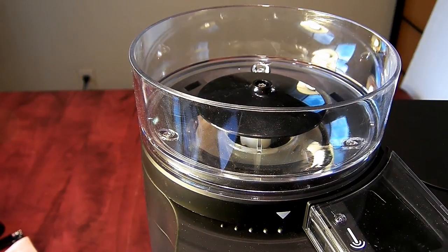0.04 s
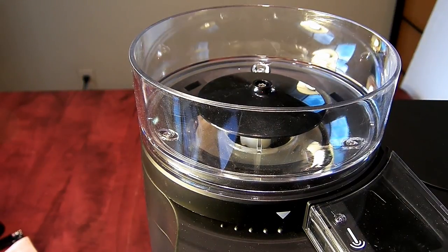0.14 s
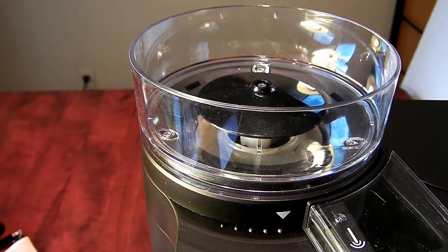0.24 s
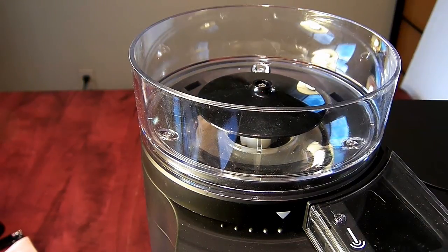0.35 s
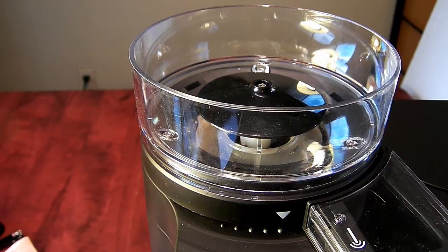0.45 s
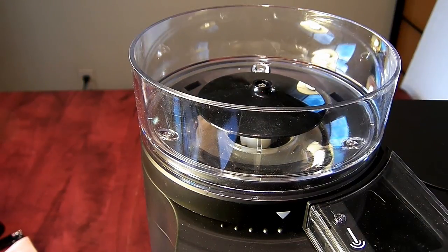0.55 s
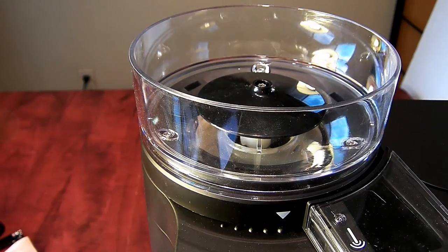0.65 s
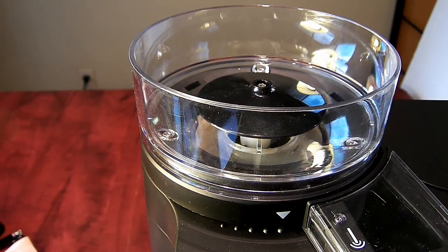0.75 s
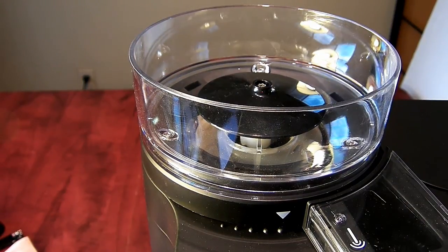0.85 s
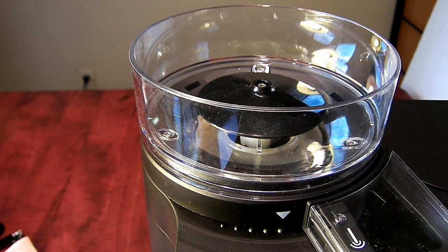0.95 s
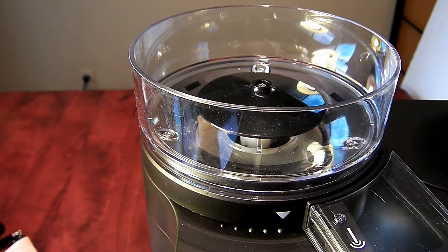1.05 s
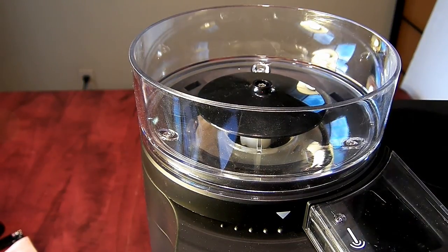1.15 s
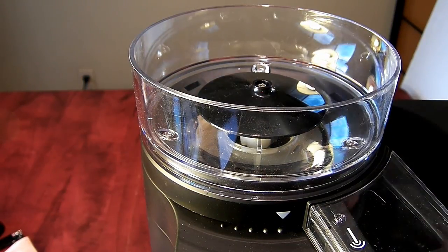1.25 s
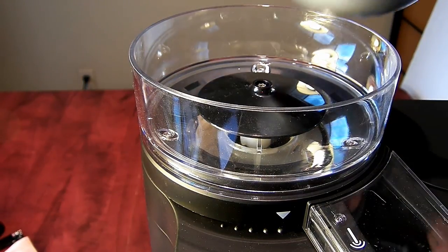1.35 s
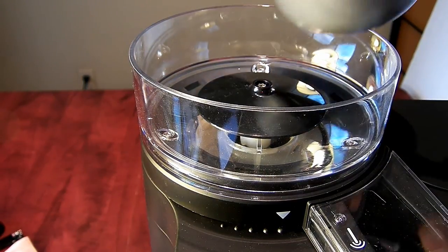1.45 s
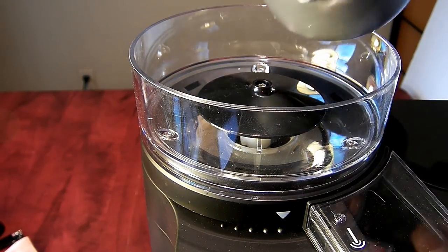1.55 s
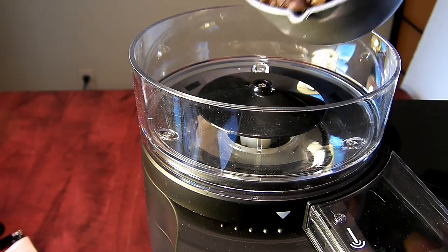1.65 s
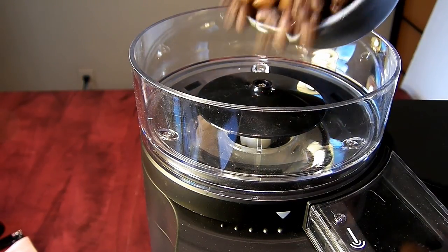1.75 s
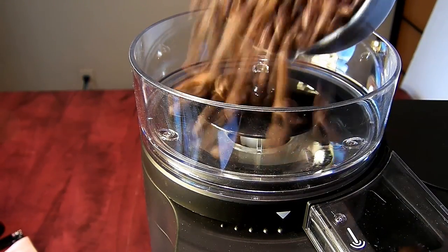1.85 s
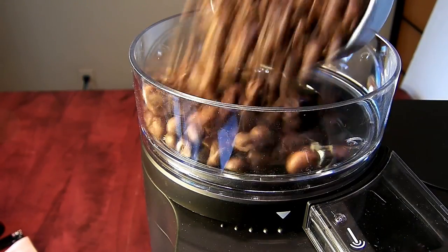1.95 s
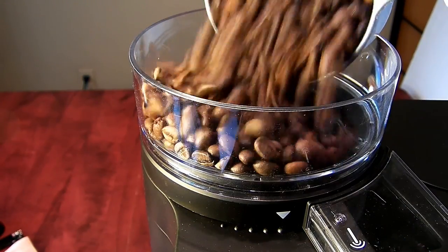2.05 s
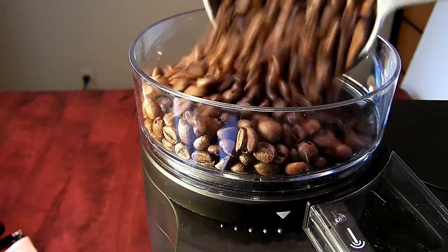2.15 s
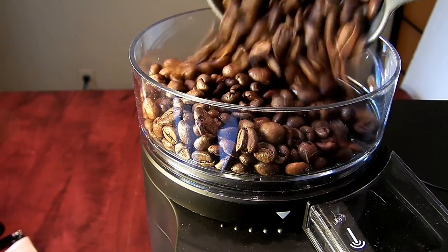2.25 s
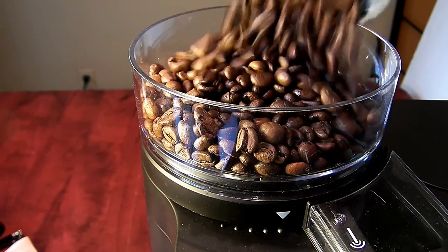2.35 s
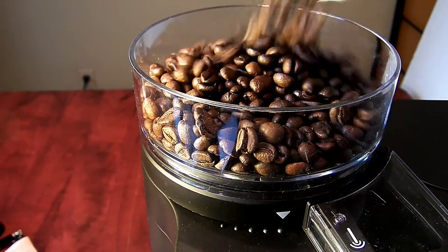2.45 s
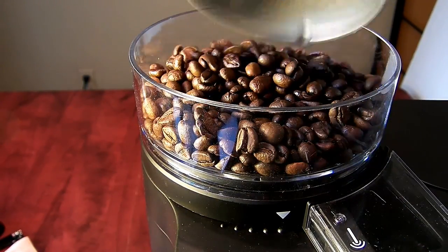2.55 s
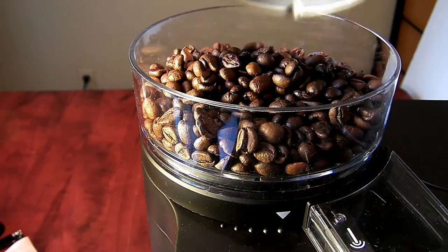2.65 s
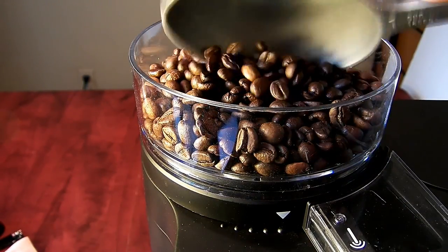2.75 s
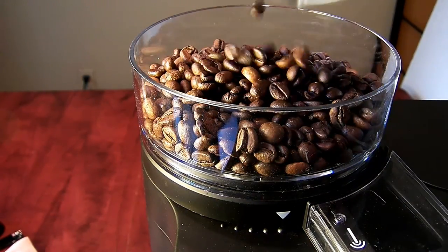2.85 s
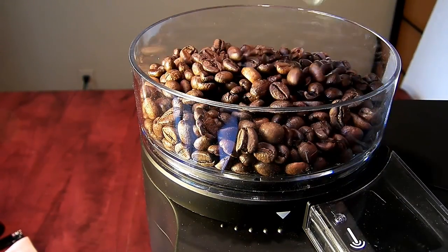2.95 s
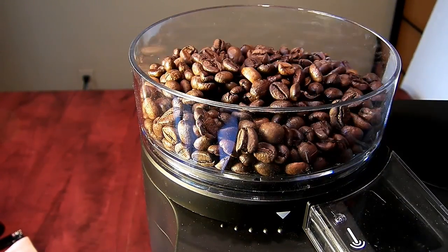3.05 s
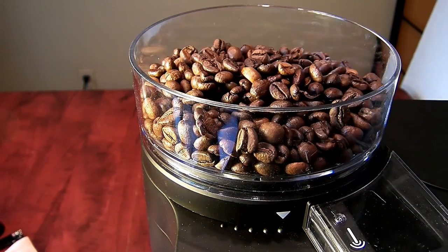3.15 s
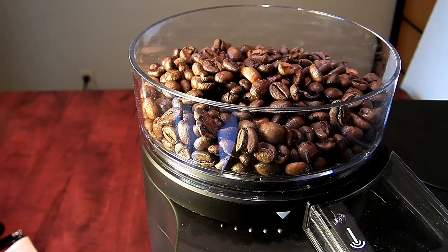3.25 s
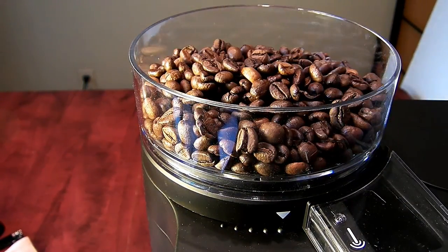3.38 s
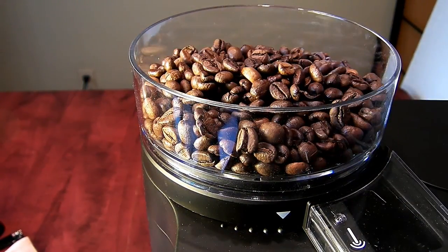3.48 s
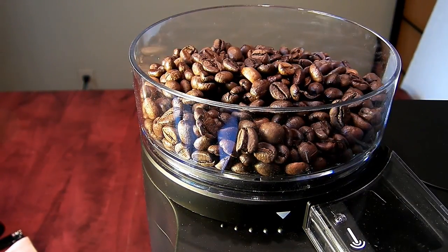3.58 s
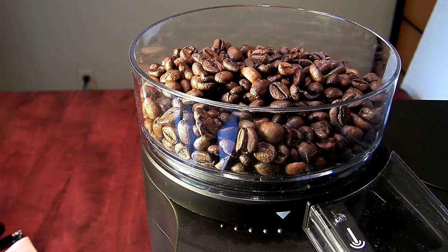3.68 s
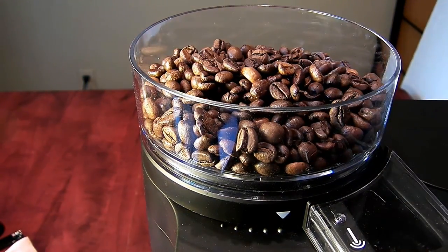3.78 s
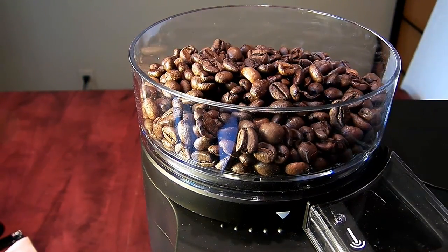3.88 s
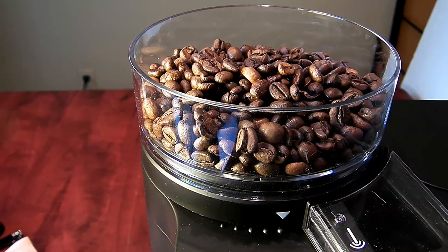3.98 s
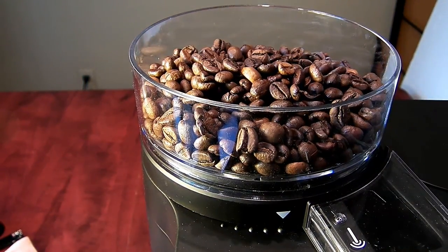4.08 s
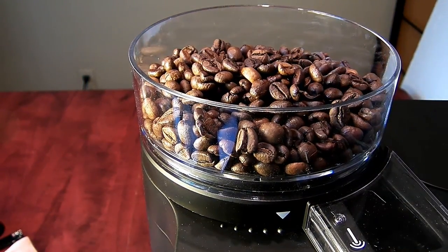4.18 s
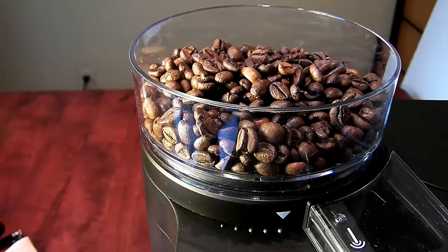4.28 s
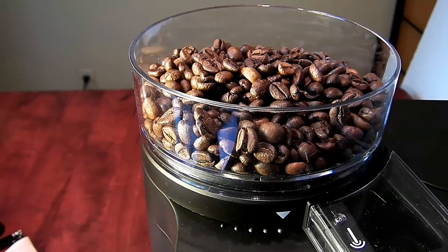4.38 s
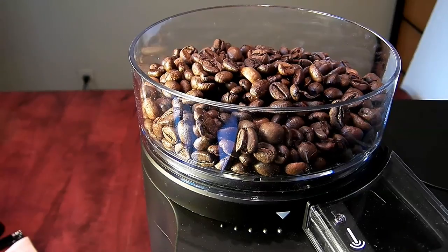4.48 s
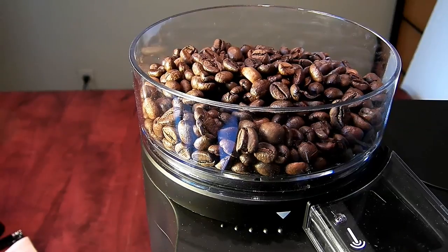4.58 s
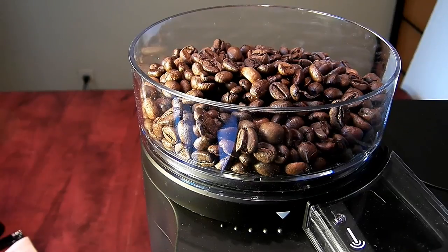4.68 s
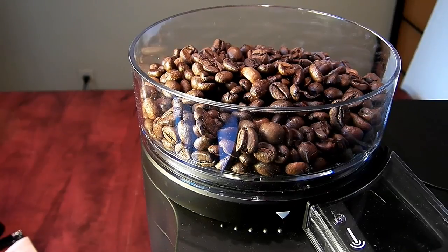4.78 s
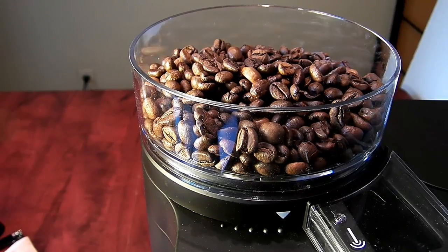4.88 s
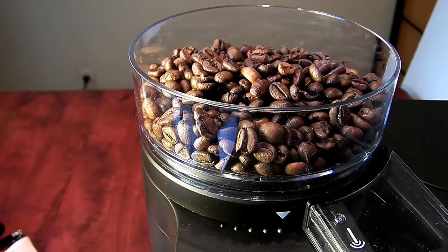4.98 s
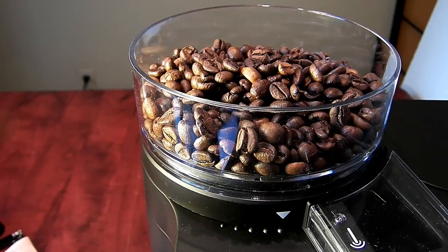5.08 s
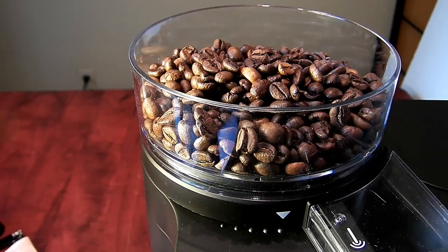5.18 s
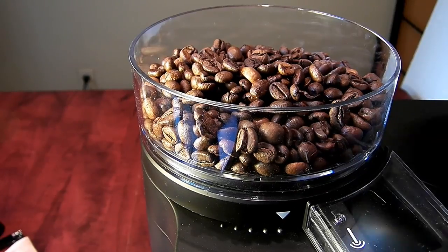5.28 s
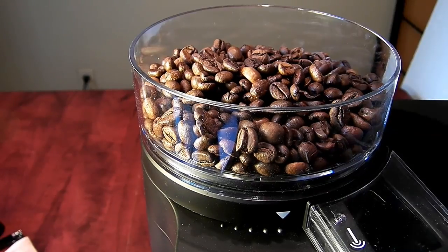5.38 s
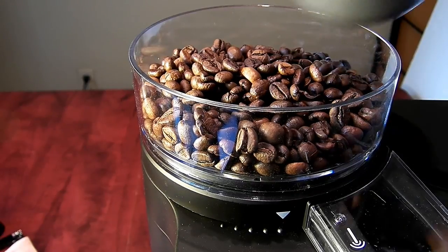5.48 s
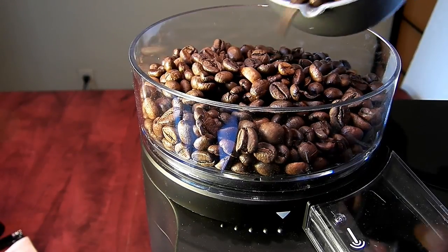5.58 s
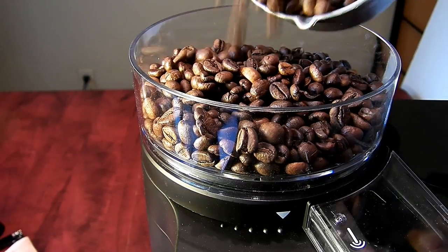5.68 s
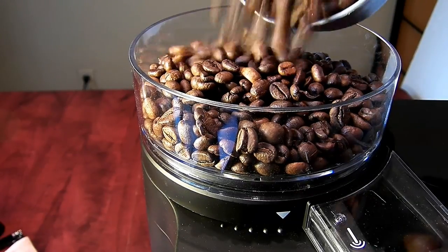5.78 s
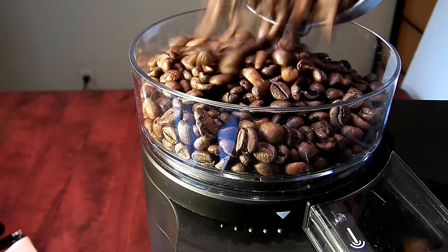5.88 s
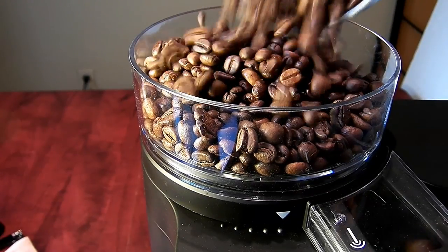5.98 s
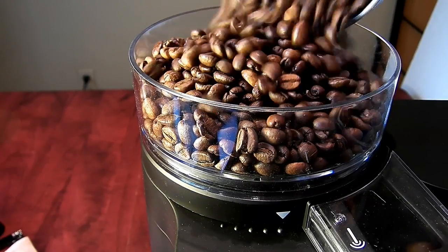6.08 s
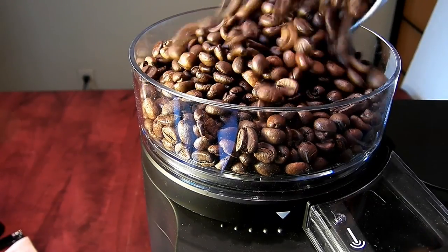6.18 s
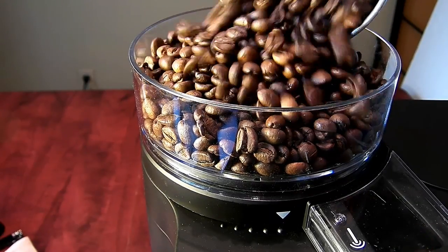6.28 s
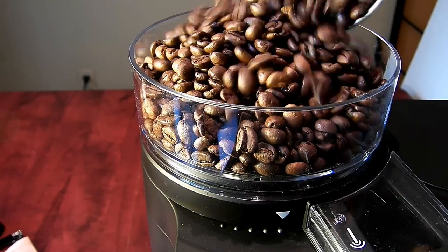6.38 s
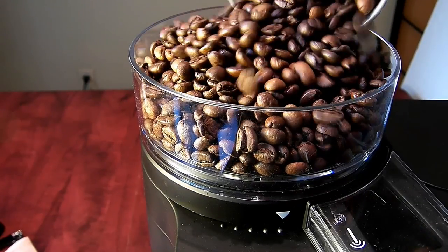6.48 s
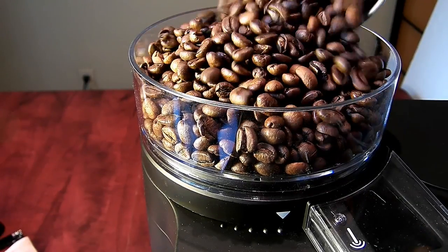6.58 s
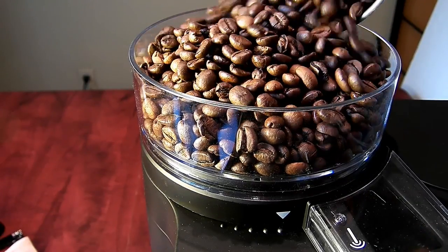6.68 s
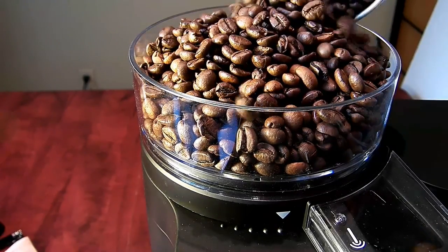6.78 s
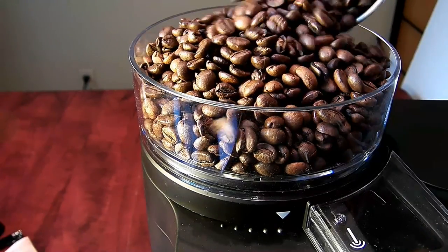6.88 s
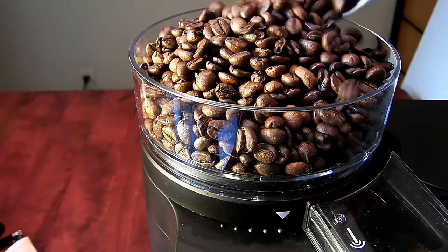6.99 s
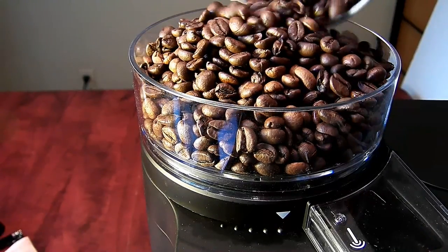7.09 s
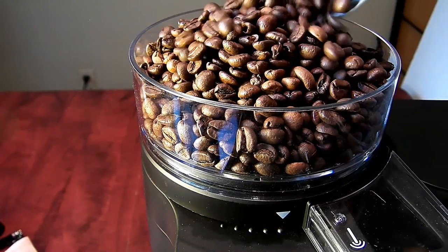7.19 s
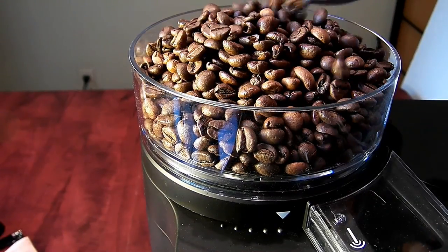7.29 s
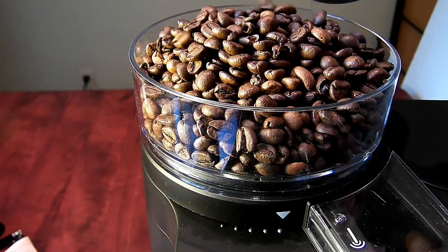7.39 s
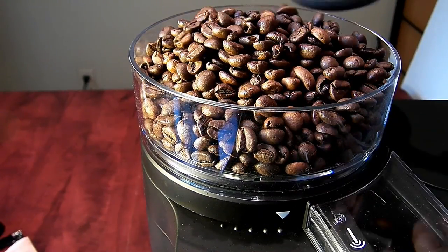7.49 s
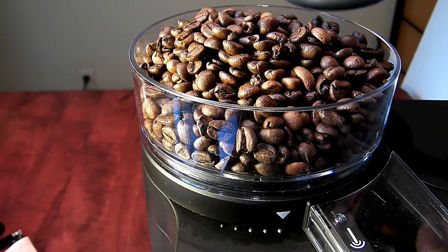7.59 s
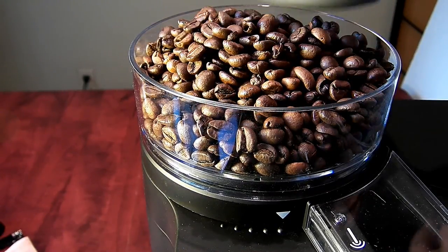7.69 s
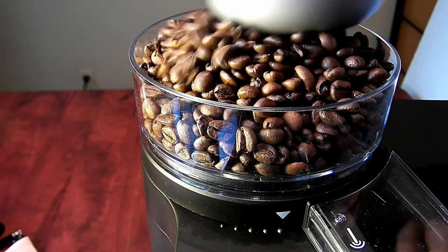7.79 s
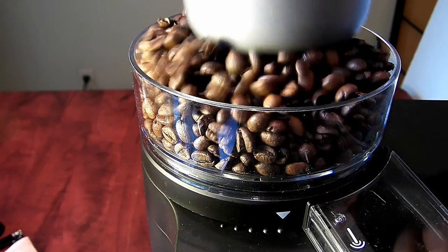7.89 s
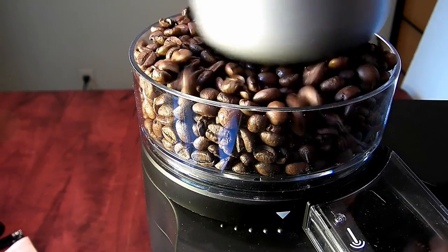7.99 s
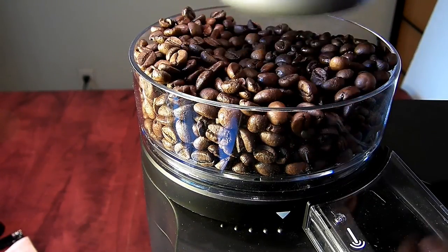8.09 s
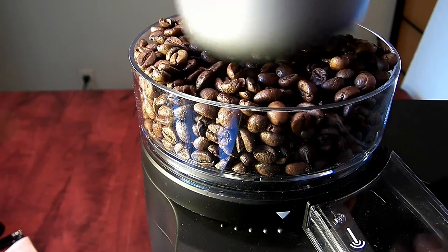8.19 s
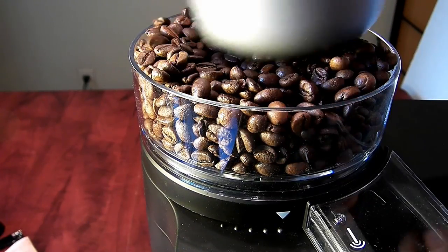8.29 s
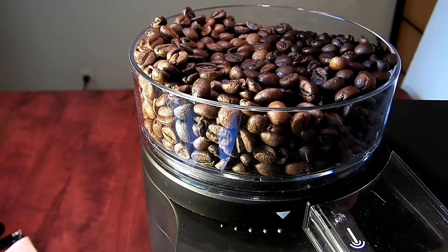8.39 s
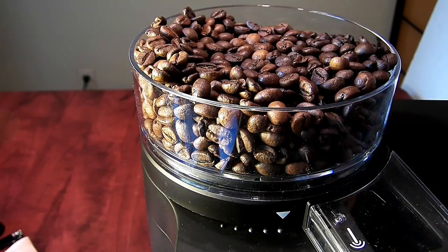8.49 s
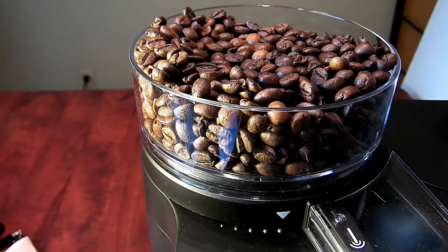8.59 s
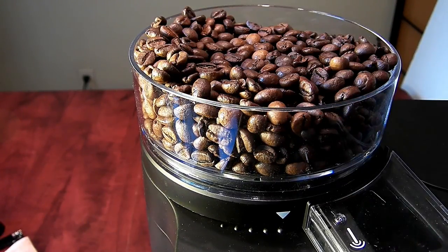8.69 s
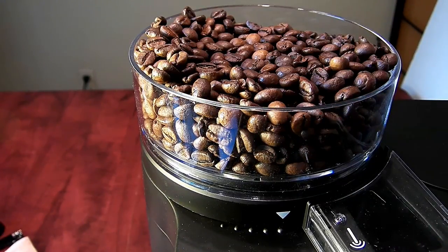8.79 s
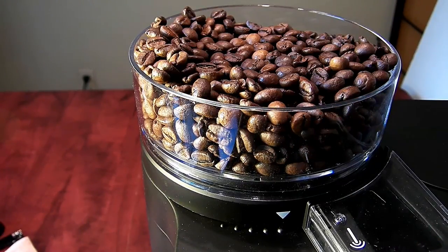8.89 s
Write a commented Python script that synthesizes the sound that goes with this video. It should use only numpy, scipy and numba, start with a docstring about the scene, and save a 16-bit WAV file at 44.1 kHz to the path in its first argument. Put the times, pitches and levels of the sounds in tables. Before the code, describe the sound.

Close stereo pickup in a small quiet kitchen with low hum and hiss. Faint bag rustle and scoop knocks on the left, then beans burst brightly into an empty plastic hopper and trickle out. The scoop digs dully in the crinkling bag, then a longer, softer pour clatters onto the heap. The scoop pushes the beans level, pats once, and quiet returns.

```python
"""A scoop digs in a bag of coffee beans to the right, over a low room tone and microphone hiss.
Twice beans are poured into a clear plastic hopper, first empty, then onto the heap, which is levelled and patted.
Moving beans are random bursts over noise; single beans are timed bursts; scoop knocks are dying sines.
Room tone and hiss are coloured noise whose levels a table lowers after the loud moments.
A short room answer and a rounding, band-limited input finish the sound."""
import sys
import numpy as np
from scipy import signal
from scipy.fft import rfft, irfft, next_fast_len
from scipy.io import wavfile
from scipy.ndimage import uniform_filter1d, map_coordinates
from numba import njit

SR = 44100
rng = np.random.default_rng(int(sys.argv[2]) if len(sys.argv) > 2 else 0)


def wav_record(signal):
    """Record a signal, one row per channel, as 16-bit PCM in the file named by sys.argv[1]."""
    frames = np.transpose(np.atleast_2d(signal))
    bounded = np.clip(frames, -1, 1)
    # unit amplitude maps onto the largest positive 16-bit level
    quanta = np.round(bounded * 32767).astype(np.int16)
    wavfile.write(sys.argv[1], SR, quanta)


N = 394254

# floor level: time_s, hum_db, hiss_db
FLOOR = [(0, -49, -55.5), (.6, -57.5, -58), (1.7, -53.5, -56), (1.97, -62.5, -70), (2.4, -76, -67),
         (2.75, -62, -62), (3.1, -61, -64.5), (3.35, -52.5, -56), (4.7, -49.5, -53), (5.2, -57.5, -59),
         (5.75, -49.5, -53), (6.5, -58, -61), (7.1, -51.5, -62), (7.89, -55.5, -63), (7.97, -65, -60),
         (8.4, -65, -72.5), (8.55, -58.5, -64.5), (8.7, -56, -57.5), (8.94, -56.5, -57.5)]
# faint whine that comes and goes: start_s, length_s, level_db
WHINES = [(0.886, 0.34, -66.5), (3.187, .3, -63), (8.612, 0.17, -68.5)]
WHINE_FADE_DB_PER_S = 150
# spectra of house hum, microphone hiss and whine: freq_hz, density_db
HUM_COLOUR = [(15, -48), (25, -26.5), (108, -8.5), (313, -18), (382, -5), (727, -14), (794, -16),
              (948, -16), (1180, -18.5), (1350, -17), (1540, -26), (1890, -21.5), (2350, -31),
              (3670, -31.5), (5000, -49), (6500, -75.5), (11000, -120)]
HISS_COLOUR = [(1470, -53), (2500, -30), (3200, -17), (3750, -4), (4500, -11), (6000, -9.5), (11100, -6),
               (16000, -6.5)]
WHINE_COLOUR = [(1100, -32), (1280, -3.5), (1420, 6), (1650, -44.5)]

# scoop digging in the bag, a short and a long visit: time_s, flow_db, brightness_db (sizzle over click)
DIG_VISITS = [
    [(0.0, -41.5, -4.5), (0.038, -58, 3), (0.084, -50.5, 6.5), (0.196, -66, -12), (0.42, -59, -14),
     (0.432, -49, -6), (0.492, -56, -10), (0.538, -45, -2.5), (0.628, -76, -3), (0.68, -70, 1)],
    [(3.36, -64, -3), (3.41, -43.5, -17), (3.47, -33, -7), (3.56, -48, -12), (3.59, -40.5, -2.5),
     (3.63, -50, -6.5), (3.67, -40, -3), (3.85, -27.5, -6), (3.96, -47, -7.5), (4.01, -35, -8),
     (4.17, -46, -4), (4.27, -31.5, -4.5), (4.63, -43.5, -5), (4.77, -61.5, 1.5), (4.78, -53, 8.5),
     (4.87, -42.5, -6), (4.98, -60, 6), (5.04, -49.5, 6), (5.12, -63, 0), (5.15, -53.5, 2), (5.18, -64, 2),
     (5.23, -56, 3), (5.24, -52.5, 6), (5.28, -64, 0), (5.5, -67.5, 0)],
]
# spectra of beans and crinkling bag: freq_hz, density_db
DIG_CLICK = [(1000, -23.5), (1700, 2.5), (1920, 2), (2510, -2), (3210, 0), (3920, 5.5), (5490, 0),
             (8000, -6.5), (10400, -47), (17600, -120)]
DIG_BODY = [(71, -60.5), (120, -29), (167, -9), (200, -13), (273, -17.5), (352, -6), (748, 1), (1410, -2),
            (1700, -9), (2210, -54.5), (3740, -120)]
CRINKLE = [(4000, -27), (6500, -5), (9000, 0), (12000, 1), (14000, -5), (16000, -8)]

# scoop knocks: time_s, level_db, pitch_hz, t60_s
KNOCKS = [(0.064, -27.5, 860, 0.016), (0.117, -38.5, 1024, 0.079), (0.534, -30.5, 753, 0.071),
          (0.55, -23.5, 762, 0.022), (1.534, -21.5, 940, 0.033), (1.565, -27, 962, 0.039),
          (1.579, -28.5, 852, 0.044), (1.706, -32.5, 855, 0.028), (1.847, -32, 547, 0.06),
          (2.738, -31.5, 1090, 0.047), (3.401, -17, 670, 0.031), (3.462, -19, 700, 0.045),
          (3.479, -15.5, 570, 0.014), (3.632, -26, 960, 0.029), (3.794, -24.5, 649, 0.081),
          (3.849, -22, 770, 0.0059), (4.41, -26, 954, 0.064), (4.513, -21, 814, 0.029),
          (4.634, -24, 860, 0.016), (4.873, -19, 630, 0.032), (5.586, -21.5, 1320, 0.038),
          (6.041, -15, 990, 0.012), (8.238, -36, 1410, 0.027)]
# hollow scoop modes: pitch_multiple, level_db
SCOOP_MODES = [(.25, -18), (.5, -5.5), (.75, -3.5), (1, 3.5), (1.3, -5.5), (1.65, -10.5), (2.2, -15.5)]
# upper scoop modes at the rim: freq_hz, level_db
RIM_MODES = [(2050, -2), (3700, 0), (4350, -4)]
# scoop at the bag: from_s, to_s
AT_BAG = [(0, 1.2), (3.3, 5.4)]
RIM_BURIED_DB, RIM_FREE_DB = -24.5, -11  # beans in the bag damp the rim
KNOCK_PAN_DB = -3.5  # left over right
STRIKE_DB, STRIKE_S = 6, 0.011  # broad first strike of a knock

# single beans: time_s, level_db, pitch_hz, sizzle_db (relative), pan_db (left over right)
TICKS = [(0.3486, -51, 3670, -4, -2.5), (0.4324, -39, 3990, -17.5, -6.5), (1.038, -32.5, 3350, -11, -8),
         (1.4955, -49, 3830, -11, 1), (1.5352, -36, 3740, -17, 0.0), (1.5993, -36, 4130, -24, 0.5),
         (1.6427, -43, 4550, -19, 0.0), (1.6521, -39, 4070, -13, 0), (1.6711, -21.5, 6150, -19, 3),
         (1.7034, -38, 4140, 0, 1.5), (1.7299, -22, 7200, -12, -2), (1.7514, -29, 3920, -8, 4),
         (1.7634, -33.5, 4100, -9, 0), (1.7828, -38, 4600, 5, 0), (1.7971, -20, 4130, -3.5, 1),
         (1.8173, -16, 7410, -10.5, -2.5), (1.8324, -8, 5620, -20, -0.5), (2.4114, -25.5, 3690, -11, -0.5),
         (2.6314, -32, 3630, -17, -0.5), (2.6494, -37, 4400, -15, -1.0), (2.6823, -42, 4300, -7, -2),
         (2.737, -28, 6940, -8, 1), (2.7483, -12, 7400, -11.5, -3), (2.7943, -23, 4820, -12, 0.5),
         (2.8128, -20, 4830, -11, 1), (2.8707, -37, 7380, -4, -2), (2.8799, -42, 3680, -7, 1.0),
         (2.8944, -39, 3750, -12, -2), (2.9138, -31.5, 3730, -10, 1), (2.927, -23.5, 4100, -14, 0.0),
         (2.9574, -38, 7150, 0, 1), (2.9772, -31.5, 3980, -15, 4), (3.008, -41, 4400, -6, -3),
         (3.018, -26, 4030, -16, 5), (3.0629, -50, 6850, 1, 0.5), (3.1035, -35, 4000, -5, -1),
         (3.566, -29.5, 5090, -6.5, -1), (3.582, -25.5, 5510, -18, -4.0), (3.6678, -24.5, 3960, -21, -5),
         (4.2647, -29.5, 4260, -11.5, -4.5), (4.3161, -24.5, 4200, -11.5, -3),
         (4.4065, -19.5, 3860, -16, -7), (4.6543, -34, 3430, -5.5, -5), (4.6636, -35.5, 3960, 1.5, 2),
         (4.779, -43.5, 4860, 6, -1), (4.88, -32.5, 3660, 0.5, -4), (4.956, -35.5, 5000, -7, -5.0),
         (4.9814, -44, 3750, -9, -2), (5.0333, -28, 3930, -17, -12), (5.0737, -33.5, 4010, -15, -4),
         (5.1297, -40.5, 3900, -5, -1.5), (5.1537, -34, 3910, -22, -7), (5.2126, -43, 3750, -10, -3.0),
         (5.2413, -26, 5900, -25, -12), (5.462, -48, 3550, 0, 0), (5.548, -18, 4400, -19, 2),
         (5.5697, -19.5, 3920, -23, -2), (5.585, -18, 3730, -3, 1.5), (5.5924, -17, 6580, -8, -1.5),
         (5.6392, -21.5, 3480, -16, -1.5), (5.66, -29, 7030, -5.5, 1.0), (5.6785, -27, 6650, -4, -0.5),
         (5.6987, -16, 4900, -10.5, 4), (5.7054, -14.5, 3800, -16, -5), (5.7309, -16, 3620, -8, 0.0),
         (5.7637, -25, 6770, 1, -0.5), (5.7683, -20, 4050, -5, 0.5), (5.7945, -14.5, 3980, -10, 1),
         (5.8119, -13.5, 4020, -14, -2), (5.8693, -11.5, 4270, -5, -1.5), (5.9763, -23.5, 4530, -4, -1.5),
         (6.0477, -17, 4390, -3.5, 1.5), (6.0833, -16.5, 7100, -2.5, -2), (6.1305, -16, 3680, -12, -3),
         (6.1897, -17.5, 3700, -14.5, 0.5), (6.2249, -15.5, 3700, -16, -1), (6.2998, -15.5, 4150, -18, 1),
         (6.317, -15, 3800, -13.5, -2), (6.3864, -20.5, 3700, -13.5, 2), (6.3943, -16.5, 3820, -14, -0.5),
         (6.4652, -29, 3750, -5, -1), (6.4833, -17.5, 3770, -13, -2), (6.5236, -21, 3810, -21.5, -1.5),
         (6.575, -16.5, 4470, -12.5, -0.5), (6.63, -18.5, 4400, -6.5, -2), (6.664, -14.5, 4340, -12, 0.5),
         (6.6754, -16, 4050, -17, -1.5), (6.7176, -25.5, 3820, -18, -1.5), (6.734, -34, 6000, -6, -0.5),
         (6.754, -13, 3630, -8, -0.5), (6.8, -33, 4230, -20, -3), (6.8249, -28.5, 4360, -10, 0),
         (6.8538, -15, 3700, -13, -1.5), (6.8872, -20, 5770, -17, 0), (6.9123, -15.5, 5930, -21, -3),
         (6.9486, -15, 3800, -13, 0), (6.989, -19.5, 6100, -10, 1), (7.002, -16.5, 4370, -21, -3),
         (7.0567, -18, 3770, -22, 1.5), (7.0664, -17, 3860, -11, 0), (7.1137, -21, 4000, -9, 0.0),
         (7.1305, -14, 6160, -11.5, -2.5), (7.1886, -24, 6040, -16, 1.0), (7.2158, -19, 4490, -20, -1),
         (7.2486, -26, 6340, -4, 0), (7.2778, -17.5, 4900, -11.5, -1), (7.3103, -23.5, 4150, -8.5, 0.5),
         (7.3432, -31, 7150, -5, -0.5), (7.3619, -18, 4030, -11.5, -2), (7.3941, -20.5, 6370, -17.5, -0.5),
         (7.4355, -21.5, 4100, -10, 0), (7.4746, -12.5, 4200, -11.5, 0), (7.492, -12, 4270, -16, -2.5),
         (7.5357, -16, 4550, -16, 0.5), (7.5484, -18.5, 4800, -8.5, 1), (7.6051, -29, 3020, -21, -1),
         (7.656, -12, 6300, -7.5, -0.5), (7.685, -26, 2820, -17, -3), (7.6944, -25.5, 4320, -15, 0.5),
         (7.7089, -24, 4560, -25, -4), (7.7275, -17.5, 5760, -28, 0.5), (7.7402, -15, 3400, -16, -1),
         (7.7464, -14.5, 4200, -17, -2.5), (7.7846, -14.5, 4120, -15, -0.5), (7.814, -20, 4180, -18, -0.5),
         (7.855, -21, 3670, -17, 0), (7.8894, -27, 3910, -6, 0), (7.9265, -15.5, 3730, -13, 0.0),
         (7.971, -27.5, 3740, -17, -1), (7.9972, -28.5, 3850, -20, 2.5), (8.055, -35, 3760, -17, -1),
         (8.0591, -28.5, 3770, -19, 0.5), (8.1778, -35.5, 4470, -15.5, -2),
         (8.2366, -22.5, 4860, -4.5, 3.5), (8.2468, -12, 4800, -15, 1), (8.2506, -17, 3930, -7, 0.0),
         (8.2824, -29, 7800, -6.5, 0), (8.2958, -29, 3730, -17, 0), (8.3664, -37.5, 3820, -23, -0.5)]
# ringing hopper wall: freq_hz, density_db
WALL_COLOUR = [(3200, -35.5), (3580, -9.5), (3700, -5.5), (3850, -10), (4300, -19.5), (4800, -43.5)]
WALL_HZ, WALL_REACH_HZ, WALL_DB, WALL_T60_S = 3740, 250, -15, 0.082  # beans near this pitch ring the wall

# pour into the empty hopper, then last beans shaken out: time_s, flow_db, brightness_db
POUR = [(1.6, -60, -5.5), (1.746, -55, -3.5), (1.844, -27, -0.5), (1.978, -29, -4.5), (2.368, -37, -10),
        (2.414, -32, -4), (2.542, -37, -6), (2.626, -61.5, -13), (2.628, -56, -10), (2.7, -63, -24),
        (2.71, -58.5, -4), (2.742, -32, -5), (2.818, -40.5, -5.5), (2.834, -54, -1.5), (3.11, -66, -1),
        (3.15, -83, 2)]
# pour onto the heap: time_s, flow_db, brightness_db
REFILL = [(5.61, -57, 9.5), (5.68, -46.5, 2), (5.702, -42, 14), (5.716, -38, -0.5), (5.83, -32, 6),
          (5.932, -36, 4), (6.48, -41, -1.5), (6.542, -42.5, -7), (6.664, -39, 4), (6.686, -41.5, -1),
          (7.018, -40, -2.5), (7.438, -43.5, 1), (7.45, -43, -15)]
# scoop levels the heap, then pats it: time_s, flow_db, brightness_db
LEVEL = [(7.45, -44, 5), (7.468, -40.5, -4.5), (7.764, -34, -4), (7.848, -33.5, -7), (7.982, -49, 1),
         (8.032, -57, -16), (8.056, -53.5, 4.5), (8.112, -65, -16), (8.19, -54.5, -11), (8.2, -48, -13),
         (8.222, -52.5, -4), (8.246, -34, 5), (8.354, -59.5, -11.5), (8.362, -62.5, -24), (8.45, -84, 3)]
# many beans land at once or the hand jogs the scoop, and the hopper sounds hollow: time_s, body_boost_db
JOGS = [(1.87, 8), (2.77, 11), (5.6, 19), (5.8, 1), (6.48, 3), (6.68, 6.5), (6.9, 9), (7.12, 11),
        (7.3, 4.5), (8.27, 6.5)]
JOG_S = 0.031
# hopper spectra, empty, filled and levelled; sizzle open and shaded by the scoop: freq_hz, density_db
EMPTY_CLICK = [(1000, -61), (1700, -16), (1810, -11.5), (2130, -8), (2430, -12.5), (2950, -13.5),
               (3580, -3.5), (4000, -3.5), (4460, -1), (4890, -8), (5820, -5.5), (6210, -3.5), (8000, -7.5),
               (10400, -11), (17600, -120)]
EMPTY_BODY = [(150, -75), (250, -40), (328, -14.5), (515, -7.5), (634, -8), (1080, -5), (1300, -10),
              (1700, -15.5), (2210, -44), (3740, -120)]
FULL_CLICK = [(1000, -42), (1700, -16.5), (2760, -9), (3130, -10), (3720, -3.5), (4020, -6), (4460, -1),
              (5050, -5), (5860, -3.5), (8000, -8), (10400, -39), (17600, -120)]
FULL_BODY = [(150, -47), (250, -15.5), (318, -13.5), (445, -5), (768, -4), (1280, -1.5), (1700, -6.5),
             (2210, -24), (3740, -120)]
LEVEL_CLICK = [(1000, -31), (1700, 0.5), (2370, -9.5), (2780, 2), (3170, 0), (3770, 3), (4080, 3.5),
               (5460, 0.5), (6380, -1), (8000, -8), (10400, -5), (17600, -120)]
LEVEL_BODY = [(150, -55), (250, -23.5), (382, -17), (738, -8), (1010, -14), (1260, 0.5), (1700, -5),
              (2210, -17.5), (3740, -120)]
SIZZLE = [(4000, -25), (6500, -1), (9000, 2.5), (12000, 2.5), (14800, -1.5), (16000, -8)]
SHADED_SIZZLE = [(4000, -22), (6500, -2), (9000, -3), (12500, -8.5), (16000, -16)]

# left-right likeness of room, bag and hopper: freq_hz, likeness (0-1)
ROOM_ALIKE = [(60, 0.81), (240, 0.83), (950, 0.63), (3770, 0), (15000, 0.19)]
DIG_ALIKE = [(100, 1), (700, 0.97), (3000, 0.2), (15000, 0.32)]
POUR_ALIKE = [(60, 0.75), (380, 1), (2380, 0.77), (15000, 0.27)]
# decay of the kitchen: freq_hz, t60_s
KITCHEN_DECAY = [(200, 0.25), (1500, 0.16), (4000, 0.14), (12000, 0.063)]
TOP_HZ = 15900  # band limit of the input


def amp(db):
    """Amplitude factor of a level in dB."""
    return 10 ** (np.asarray(db) / 20)


def along(points, hz):
    """Interpolates (freq_hz, value) points on a log axis."""
    f, v = np.transpose(points)
    return np.interp(np.log(hz + 1), np.log(f + 1), v)


def curves(rows, start=0, stop=N):
    """One value per sample for each column after the time."""
    s, *cols = np.transpose(rows)
    t = np.arange(start, stop) / SR
    return [np.interp(t, s, c) for c in cols]


def filtered(x, response):
    """x times a complex response of frequency."""
    m = next_fast_len(N + SR // 2)
    return irfft(rfft(x, m) * response(np.fft.rfftfreq(m, 1 / SR)), m)[..., :N]


def coloured(x, spectrum):
    """Minimum-phase colour that keeps white noise at its rms."""
    hz = np.fft.rfftfreq(4096, 1 / SR)
    cep = irfft(np.log(amp(along(spectrum, hz)) + 1e-6))
    # folding the cepstrum makes the pulse causal
    cep = np.concatenate([cep[:1], 2 * cep[1:len(hz) - 1], np.zeros(len(hz) - 1)])
    pulse = irfft(np.exp(rfft(cep)))
    pulse = pulse[None] / np.linalg.norm(pulse)
    return signal.oaconvolve(np.float32(x), np.float32(pulse), axes=1)[:, :N]


def placed(pair, alike, lag_s=0.):
    """Two unrelated sounds become left and right of given likeness; left hears lag_s later."""
    m = next_fast_len(N + SR // 2)
    hz, (a, b) = np.fft.rfftfreq(m, 1 / SR), rfft(pair, m)
    turn = np.arccos(np.clip(along(alike, hz), -1, 1)) / 2
    lag = np.exp(-1j * np.pi * hz * lag_s)  # half the lag on each side
    mid, side = a * np.cos(turn), b * np.sin(turn)
    return irfft(np.array([(mid + side) * lag, (mid - side) / lag]), m)[:, :N]


@njit
def add(out, at, crack, ring, fade, slow, step, phase, noise, pick):
    """Adds 300 samples of dying noise and a dying sine, turned on step by step, for every hit."""
    for i in range(len(at)):
        c, s = slow[i] * np.cos(step[i]), slow[i] * np.sin(step[i])
        for k in range(2):
            a, x, y = crack[i], ring[i] * np.cos(phase[i, k]), ring[i] * np.sin(phase[i, k])
            for n in range(300):
                out[k, at[i] + n] += a * noise[k, pick[i] + n] + y
                a, x, y = a * fade[i], c * x - s * y, s * x + c * y


def bursts(at, size, life_s, hz, tone, length):
    """Short hits at samples at: a noise crack shares its energy with a slower-dying tone; a pair of draws."""
    tone, draw = np.clip(tone, 0, 1), rng.random((len(at), 3))
    fade, slow = (amp(-60 / SR / np.clip(k * life_s, 2e-4, .03)) for k in (1, 3.5))
    # scaled so that energy does not depend on the decay
    crack = size * np.sqrt((1 - tone) * (1 - fade ** 2))
    ring = size * np.sqrt(2 * tone * (1 - slow ** 2))
    out = np.zeros((2, length + SR))
    noise = np.sign(rng.standard_normal((2, SR + SR // 8)))
    step, phase = 2 * np.pi * hz / SR, 2 * np.pi * draw[:, :2]
    add(out, at, crack, ring, fade, slow, step, phase, noise, (draw[:, 2] * SR).astype(int))
    return out[:, :length]


def stream(table, click, body, per_s, spread_db, life_s, tone, wash, body_db, dull_share,
           wall_db=None, sizzle=SIZZLE, jogs=()):
    """Random bean hits over a wash of faint ones; flow drives all layers, duller flow has more hollow body."""
    start, stop = round(table[0][0] * SR), round(table[-1][0] * SR)
    length, wash, out = stop - start, np.clip(wash, 0, 1), np.zeros((2, N))
    when, loud, life, pitch = rng.random((int(per_s * length / SR), 4)).T
    at = (when * length).astype(int)
    size = amp(-spread_db * np.log(0.036 + loud))
    size *= np.sqrt(length / np.sum(size ** 2))

    flow_db, bright_db = curves(table, start, stop)
    t = np.arange(start, stop) / SR
    jog_db = sum(db * np.exp(-((t - s) / JOG_S) ** 2) for s, db in jogs)
    levels = [flow_db, flow_db + body_db - dull_share * bright_db + jog_db, flow_db + bright_db]
    if wall_db is not None:  # a bag has no wall
        levels.append(flow_db + wall_db)

    # colour, lo_hz, hi_hz, life_factor
    layers = ((click, 1700, 8000, 1), (body, 300, 1700, 2.5), (sizzle, 8000, 16000, .7),
              (WALL_COLOUR, 3500, 4400, 2.5))
    for level_db, (spectrum, lo_hz, hi_hz, slow) in zip(levels, layers):
        hz = lo_hz + (hi_hz - lo_hz) * pitch
        hits = bursts(at, size, slow * life_s * (.5 + life), hz, tone, length)
        hits = np.sqrt(1 - wash) * hits + np.sqrt(wash) * rng.standard_normal((2, length))
        sound = coloured(hits, spectrum)[:, :length]
        out[:, start:stop] += amp(level_db) * sound / np.std(sound)
    return out


def room_tone():
    """Distant house hum, a little unsteady, a passing whine, and hiss independent in the two microphones."""
    t, (hum_db, hiss_db) = np.arange(N) / SR, curves(FLOOR)
    sway = map_coordinates(rng.standard_normal(60), [t * 6])  # 6 random points per second
    hum = amp(hum_db + 0.61 * sway) * coloured(rng.standard_normal((2, N)), HUM_COLOUR)
    on = np.zeros(N)
    for start_s, length_s, db in WHINES:
        outside_s = np.clip(np.maximum(start_s - t, t - start_s - length_s), 0, None)
        on += amp(db - WHINE_FADE_DB_PER_S * outside_s)
    whine = on * coloured(rng.standard_normal((2, N)), WHINE_COLOUR)
    hiss = amp(hiss_db) * coloured(rng.standard_normal((2, N)), HISS_COLOUR)
    return placed(hum + whine, ROOM_ALIKE, lag_s=5e-5) * amp([[-.8], [.8]]) + hiss


def dig_in_bag():
    """Scoop strokes stir beans in the bag: the bag crinkles bright, deep strokes are dull."""
    dig = sum(stream(visit, DIG_CLICK, DIG_BODY, per_s=1000, spread_db=2.5, life_s=0.0062, tone=0.31,
                     wash=0.59, body_db=-3, dull_share=0.44, sizzle=CRINKLE) for visit in DIG_VISITS)
    return placed(dig, DIG_ALIKE, lag_s=6e-5) * amp([[-1.5], [1.5]])


def ring_modes(modes, t):
    """Sum of steady sines with slightly random levels and phases."""
    return sum(amp(db + rng.normal(0, 1.35)) * np.sin(2 * np.pi * hz * t + rng.normal(0, 1))
               for hz, db in modes)


def knocks():
    """The scoop bumps bag, rim and heap: a soft contact, dying hollow and rim modes, a broad first strike."""
    out, t = np.zeros(N + SR), np.arange(SR // 8) / SR
    for s, db, hz, t60_s in KNOCKS:
        buried = any(a < s < b for a, b in AT_BAG)
        rim_db = RIM_BURIED_DB if buried else RIM_FREE_DB
        hollow = ring_modes([(hz * k, level) for k, level in SCOOP_MODES], t) * amp(-60 * t / max(t60_s, .005))
        rim = ring_modes(RIM_MODES, t) * amp(rim_db - 60 * t / 0.032)
        chatter = 1 + 0.92 * uniform_filter1d(rng.standard_normal(len(t)), size=24)
        onset = 1 - np.exp(-t / 0.00067)
        out[round(s * SR):][:len(t)] += amp(db - 5.5) * (hollow + rim) * chatter * onset
    s, db, hz, _ = np.transpose(KNOCKS)
    at = np.round(s * SR).astype(int)
    strike = bursts(at, amp(db + STRIKE_DB), STRIKE_S + 0 * s, hz, 0, N)[:1]
    return (out[:N] + coloured(strike, DIG_BODY)) * amp([[KNOCK_PAN_DB / 2], [-KNOCK_PAN_DB / 2]])


def ticks():
    """Single beans strike wall or heap, ringing the wall if near its pitch; also returns the pan gains."""
    s, db, hz, sizzle_db, pan_db = np.transpose(TICKS)
    at = np.round(s * SR).astype(int)
    life_s = 0.007 * np.exp(0.22 * rng.standard_normal(len(s)))
    click = coloured(bursts(at, amp(db + 8.5), life_s, hz, 0.071, N), FULL_CLICK)
    body = coloured(bursts(at, amp(db - 9.0), life_s, hz / 4, 0.031, N), LEVEL_BODY)
    sizzle = coloured(bursts(at, amp(db + sizzle_db + 18.0), 1.3 * life_s, 2 * hz, 0.042, N), SIZZLE)
    match = np.exp(-((hz - WALL_HZ) / WALL_REACH_HZ) ** 2)
    impulses = np.bincount(at, amp(db + WALL_DB) * match, N)
    struck = signal.lfilter([1], [1, -amp(-60 / SR / WALL_T60_S)], impulses)
    wall = coloured(struck * rng.standard_normal((2, N)), WALL_COLOUR)
    side_db = np.interp(np.arange(N), at, pan_db)  # glides from bean to bean
    return click + body + sizzle + wall, amp([side_db / 2, -side_db / 2])


def pour_into_empty():
    """Beans rattle on the bare hopper, whose wall rings."""
    return stream(POUR, EMPTY_CLICK, EMPTY_BODY, per_s=1300, spread_db=3.0, life_s=0.0043, tone=0.21,
                  wash=0.39, body_db=-19.5, dull_share=0.033, wall_db=-15.5, jogs=JOGS)


def pour_onto_heap():
    """Beans fall on beans: sparser, shorter hits with more body."""
    return stream(REFILL, FULL_CLICK, FULL_BODY, per_s=700, spread_db=3.0, life_s=0.003, tone=0.31,
                  wash=0.31, body_db=-12, dull_share=0.59, wall_db=-10, jogs=JOGS)


def level_heap():
    """The scoop pushes and pats the heap, shading the sizzle."""
    return stream(LEVEL, LEVEL_CLICK, LEVEL_BODY, per_s=900, spread_db=5.5, life_s=0.0021, tone=0.31,
                  wash=0.19, body_db=-13.5, dull_share=0.076, wall_db=-23, sizzle=SHADED_SIZZLE, jogs=JOGS)


def kitchen(x):
    """Room answer of noise in which each frequency dies at its own speed."""
    hz, t, z = signal.stft(rng.standard_normal((2, SR // 2)), SR, nperseg=256)
    decay = amp(-60 * t / along(KITCHEN_DECAY, hz)[:, None])
    tail = signal.istft(z * decay, SR, nperseg=256)[1]
    tail = tail / np.linalg.norm(tail[0])
    late = np.pad(x.mean(axis=0), (130, 0))[None]  # 130 samples of delay
    return signal.fftconvolve(np.float32(late), np.float32(tail), axes=1)[:, :N]


def scene():
    """Bag, knocks and hopper, with their room answer, over the room tone."""
    floor = room_tone()
    bag = dig_in_bag()
    bumps = knocks()
    single, spot = ticks()
    hopper = pour_into_empty() + pour_onto_heap() + level_heap() + single
    near = placed(hopper, POUR_ALIKE) * spot + bumps + bag
    return near + amp(-7) * kitchen(near) + floor


def record(dry):
    """The input rounds off the sharpest peaks, drops the deep bass and keeps nothing above its band limit."""
    soft = dry / (1 + np.abs(dry / .5) ** 4) ** (1 / 4)
    return filtered(soft, lambda hz: (1j * hz / (1j * hz + 45)) ** 3 * (hz < TOP_HZ))


dry = scene()
out = record(dry)
wav_record(out)
```